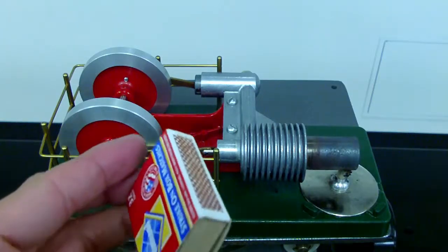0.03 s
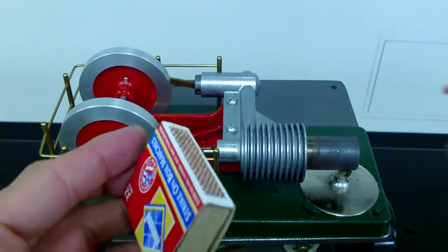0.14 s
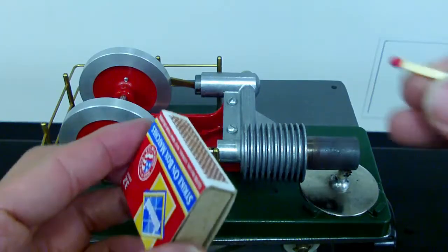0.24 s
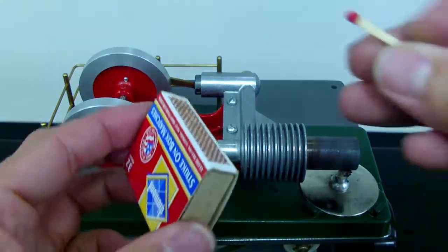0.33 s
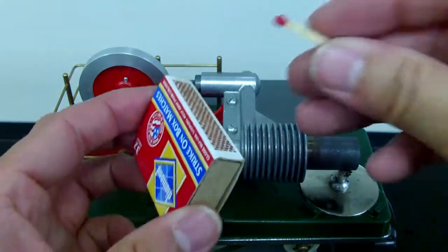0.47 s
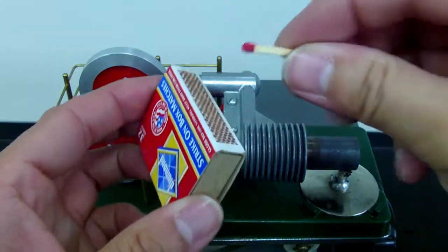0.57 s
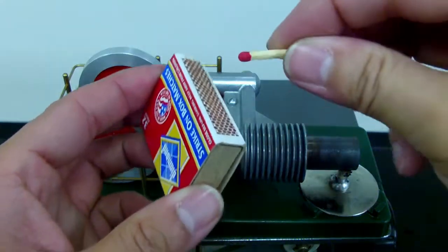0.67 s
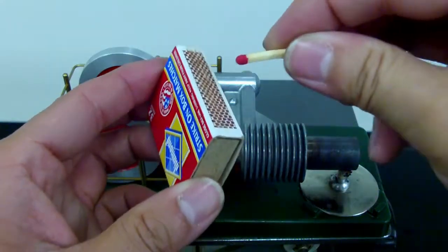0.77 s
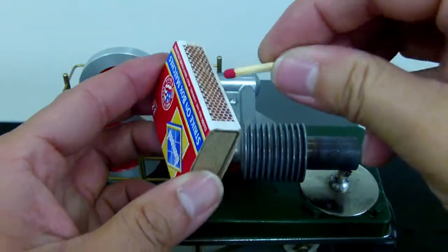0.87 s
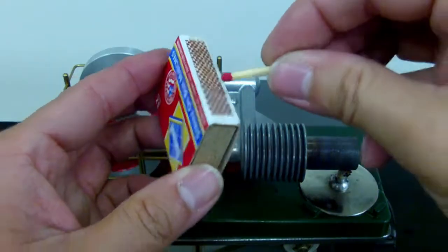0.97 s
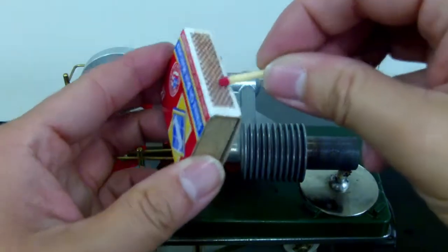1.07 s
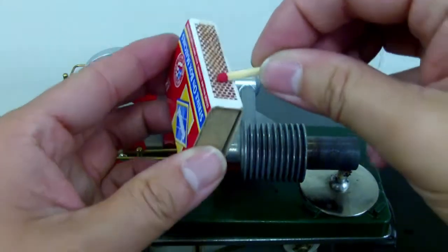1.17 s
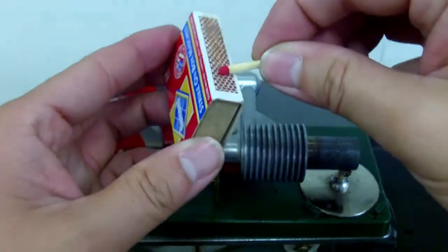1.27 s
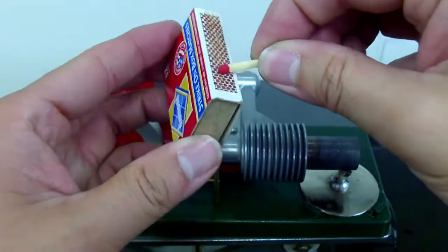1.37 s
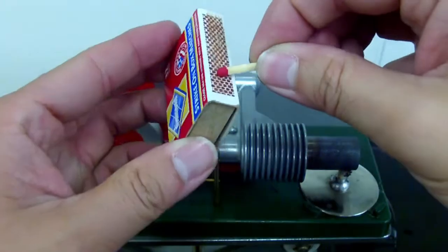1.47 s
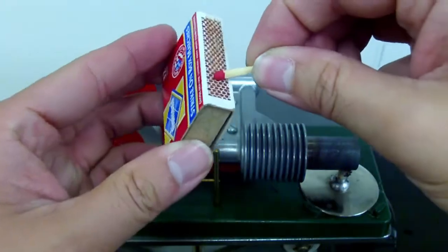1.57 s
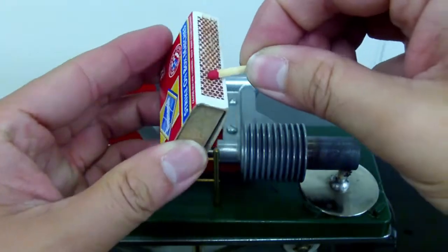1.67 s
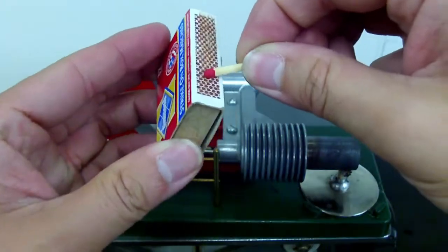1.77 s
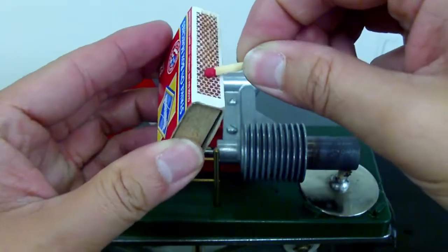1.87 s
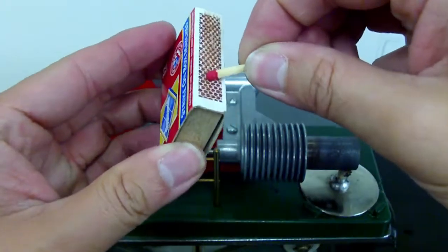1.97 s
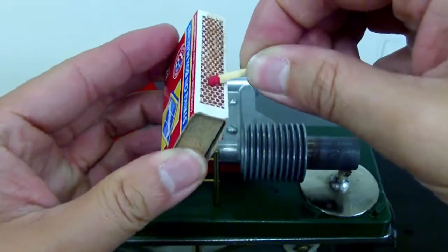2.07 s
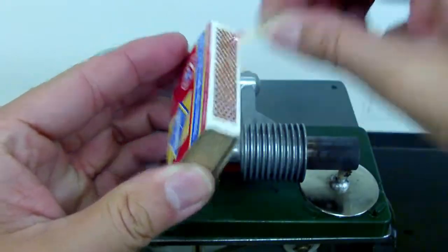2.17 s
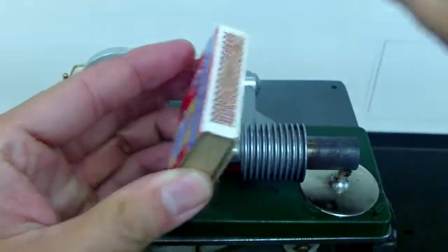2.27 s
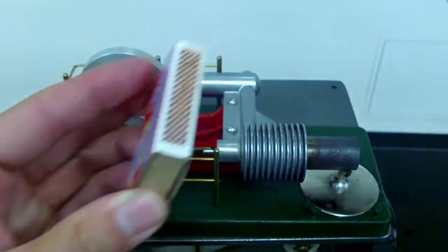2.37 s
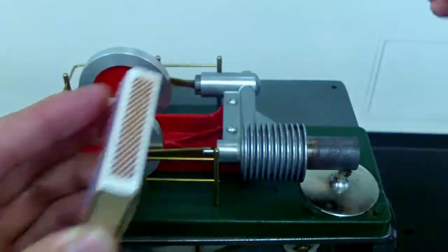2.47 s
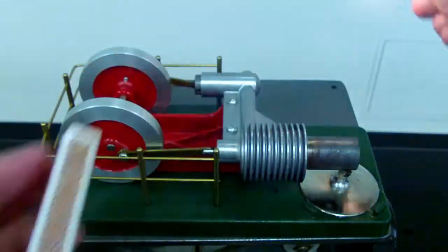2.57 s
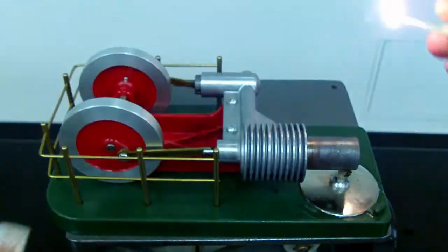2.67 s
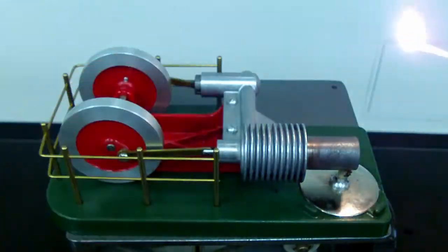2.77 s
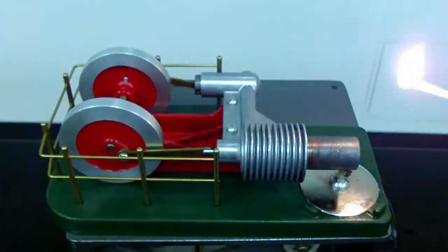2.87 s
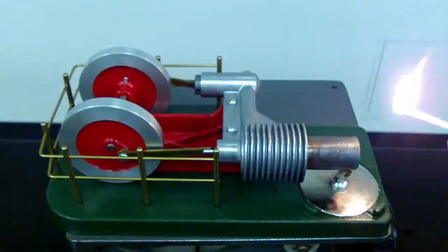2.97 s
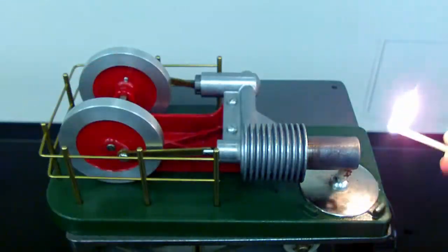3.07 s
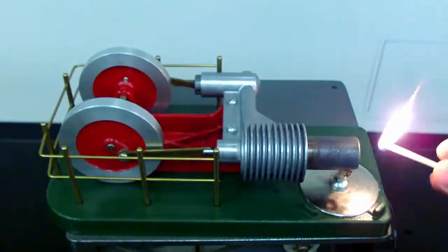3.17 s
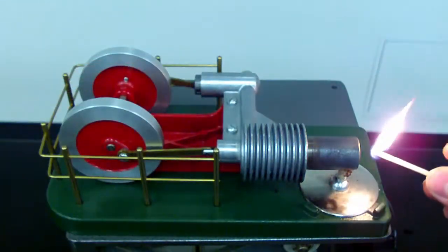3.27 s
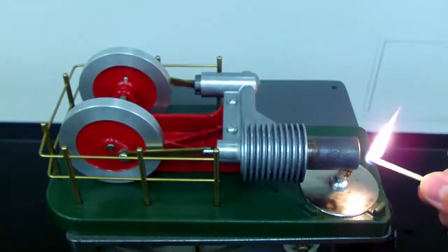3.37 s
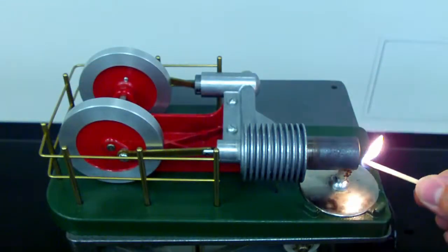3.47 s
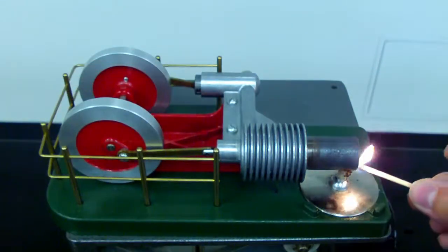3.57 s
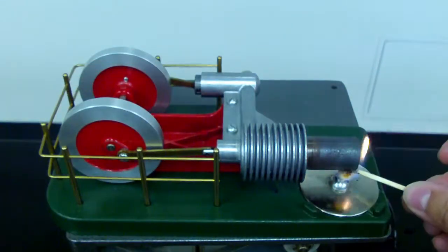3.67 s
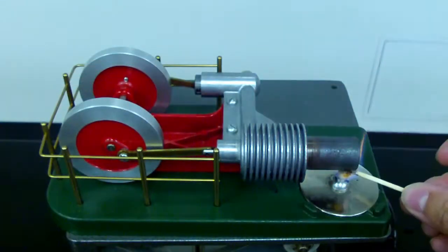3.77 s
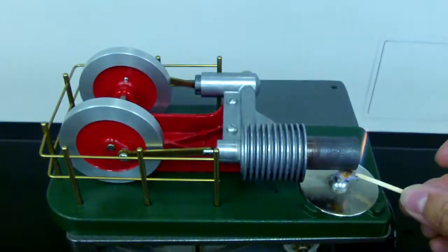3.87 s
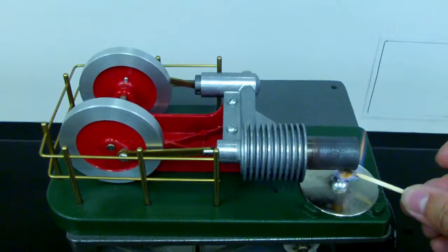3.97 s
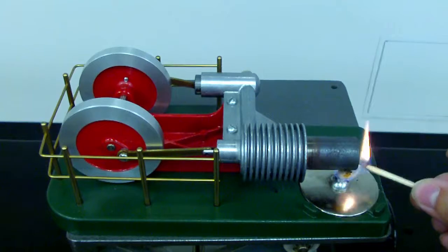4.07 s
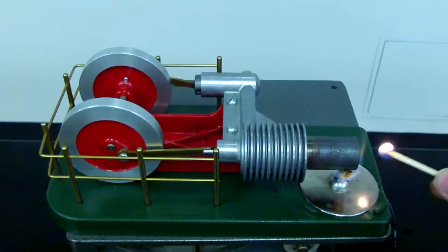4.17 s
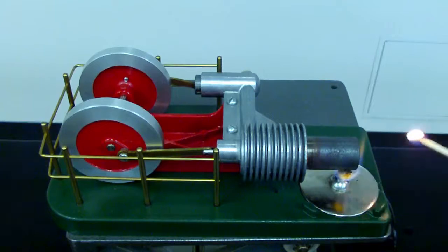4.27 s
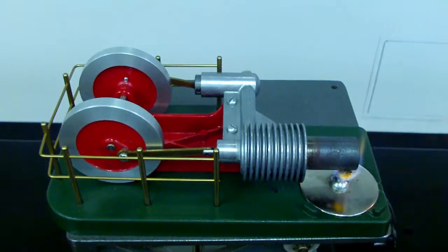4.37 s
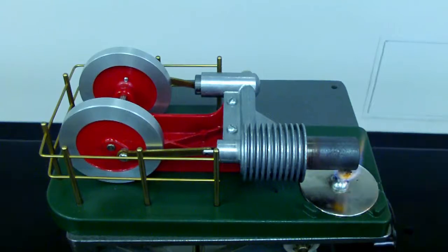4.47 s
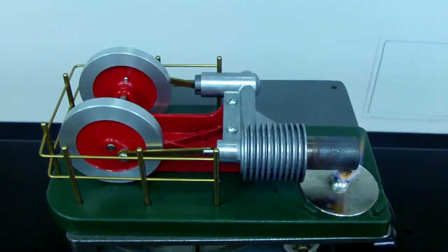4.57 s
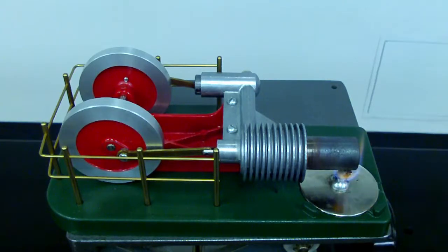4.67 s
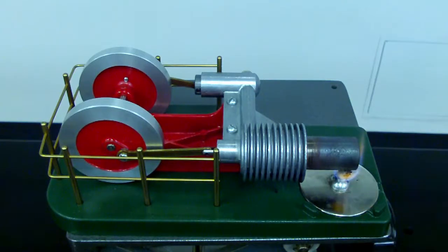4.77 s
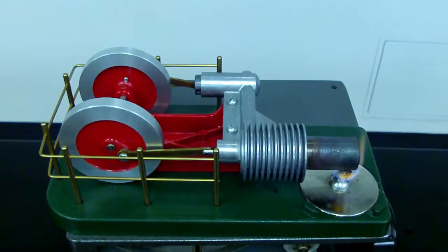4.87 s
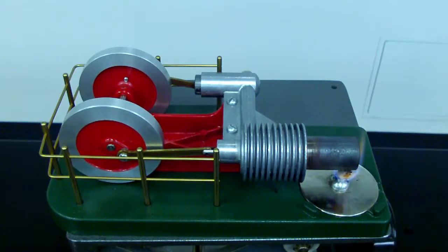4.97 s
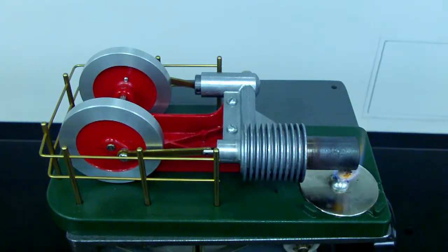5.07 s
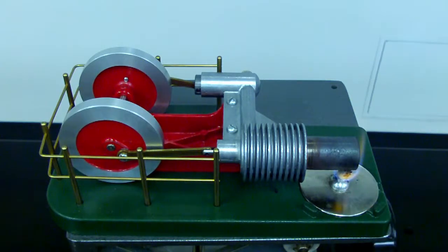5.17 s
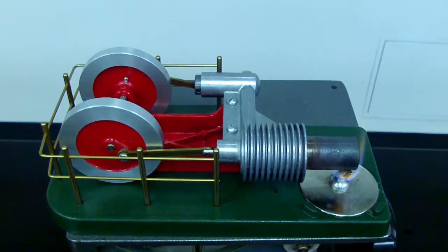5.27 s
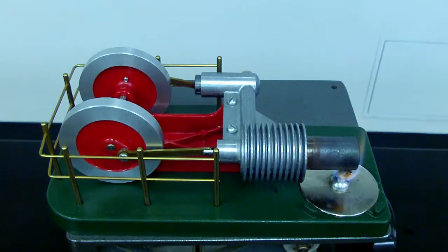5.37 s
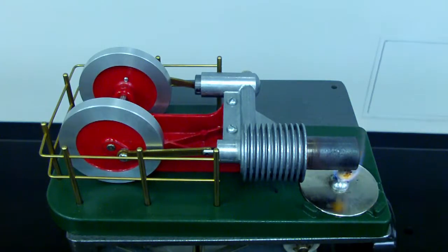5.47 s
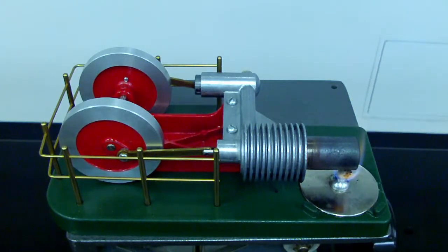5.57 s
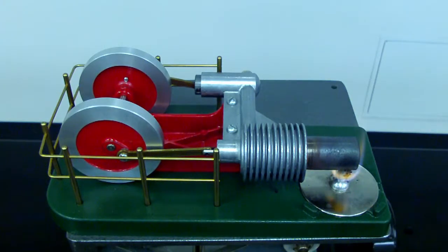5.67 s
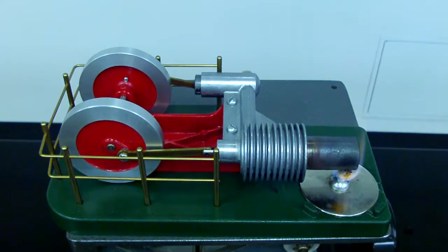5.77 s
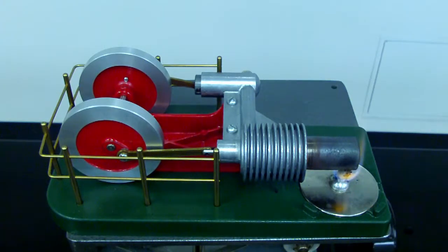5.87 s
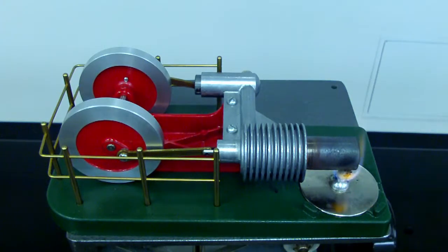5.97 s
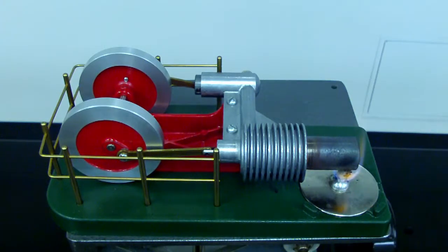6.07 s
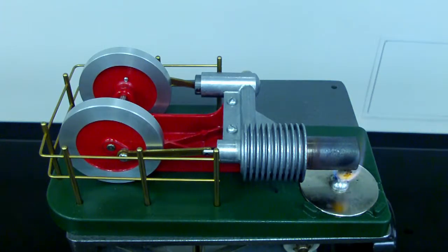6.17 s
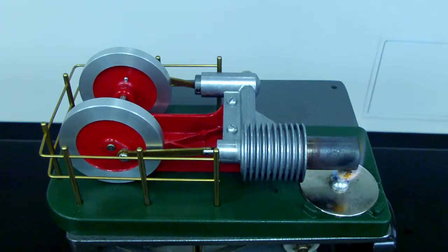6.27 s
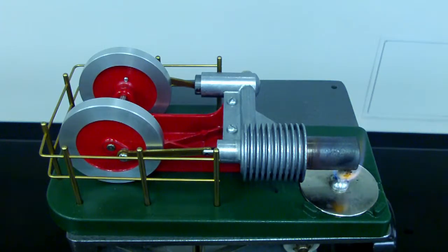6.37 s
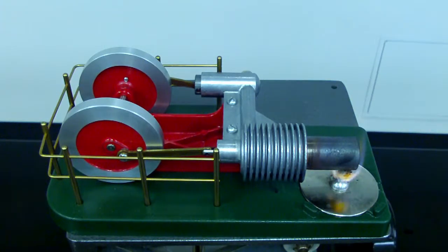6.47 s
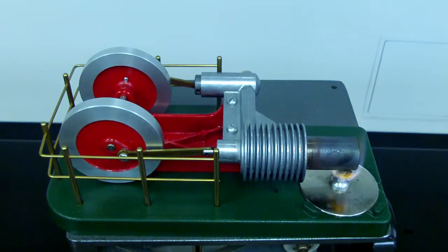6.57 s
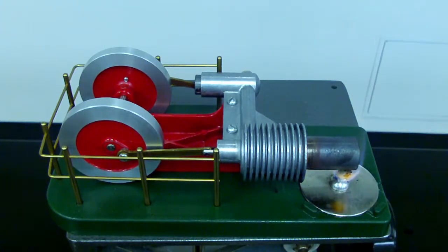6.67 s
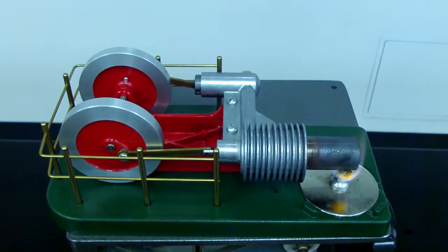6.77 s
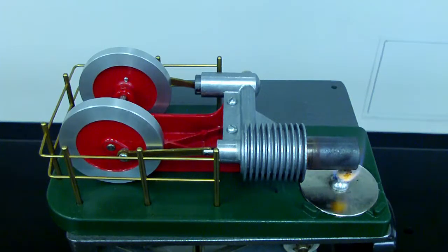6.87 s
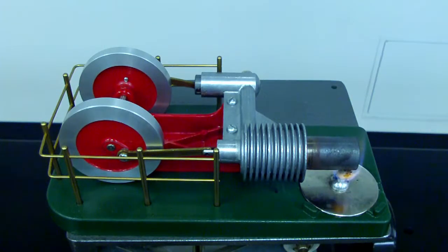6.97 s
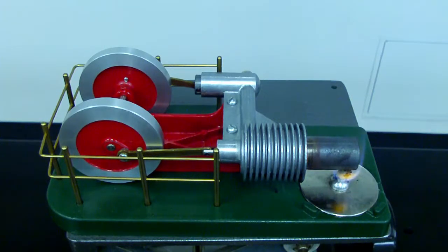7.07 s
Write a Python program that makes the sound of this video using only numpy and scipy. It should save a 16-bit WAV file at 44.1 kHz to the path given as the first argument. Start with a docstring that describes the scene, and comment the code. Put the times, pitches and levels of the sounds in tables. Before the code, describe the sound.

Close, dry handling of a small card box comes first: papery brushes, thin skin squeaks, light hollow taps and tentative scratches. After a brief stillness, a match is struck in one fast, stuttering tear that overloads the small microphone. Gas hisses and spits, sharp pops cluster as the head burns out, and a thin sizzle fades. Afterwards there is only faint room hiss, a slowly returning low murmur, isolated ticks and slight handling sounds.

```python
"""Over quiet-room hiss and a low murmur, fingers brush, knock and lightly scrape a cardboard matchbox close
to a small microphone, a match feeling for its striker; one fast stroke then catches and slips over the grit,
as grain streams that ring the box and stick and overload the microphone. The head flares, fizzes in countless
small bursts and crackles out to a thin sizzle; a few small ticks and scrapes follow. After the stroke a bass
suppressor takes some seconds to let the low murmur back in, because its threshold sinks slowly."""
import sys
import numpy as np
from scipy import signal
from scipy.fft import rfft, irfft
from scipy.io import wavfile
from scipy.ndimage import uniform_filter1d, minimum_filter1d, map_coordinates

SR = 44100
rng = np.random.default_rng(int(sys.argv[2]) if len(sys.argv) > 2 else 0)


def unload_wav(signal):
    """Save mono or channel-first audio to the path in sys.argv[1] as 16-bit WAV at rate SR, clipped to [-1, 1]."""
    wavfile.write(
        sys.argv[1],
        SR,
        np.round(np.clip(np.atleast_2d(signal).T, -1, 1) * 32767).astype(np.int16),
    )


N = 314360
T = np.arange(N) / SR
EASE_DB_PER_S = 52  # light touches ease off as they slide
LIGHT_S = 2.277  # the head catches fire
SNAP_S, SLIP_S = 0.00022, 0.0005  # rise and release of the stroke's contacts

# head catching on the grit and tearing free: start_s, length_s, level_db, box_ring_rel_db, squeal_hz, squeal_rel_db
CATCHES = [(2.202, 0.00027, -1, -11, 10380, -3), (2.203, .0008, -18.5, 9, 8810, -6.5),
           (2.2117, 0.0018, -24, 10, 4460, -5), (2.214, 0.0011, -19.5, 4, 10480, -3.5),
           (2.2213, .0012, 0.5, -17, 10370, -5), (2.2225, 0.0013, -9, -1, 10240, -3),
           (2.231, .0005, -11, -5, 8910, -6), (2.2323, 0.00052, -0.5, -17, 9700, -1),
           (2.234, 0.00089, -6, -13.5, 10230, 0.5), (2.236, .0006, -7.5, 1, 6500, -7),
           (2.237, 0.0019, -3, -11, 8450, -0.5), (2.2423, 0.00056, -8, -10.5, 9420, -0.5),
           (2.2449, 0.0011, -7, -12.5, 9960, -4), (2.2475, .0005, -10.5, -9, 7000, -3),
           (2.2494, .0005, -6, -10, 9800, 0.5), (2.2603, .002, -14.5, -9, 9120, -4.5),
           (2.2636, 0.0014, -5.5, -18, 10700, -2), (2.2658, .0033, -2.5, -19, 10410, -9),
           (2.2699, .0008, -7, -7, 6200, -3), (2.2742, .002, -11, 0, 4110, -2.5)]
# spectrum of escaping gas: freq_hz, relative_db (per Hz)
GAS_SPECTRUM = [(100, -59), (500, -24), (750, -5), (1100, -4.5), (2000, -1.5), (3000, 2), (5000, 1.5),
                (7000, 3), (9500, 5.5), (12500, -1.5), (16000, -3)]


def undb(db):
    """Decibels to gain."""
    return 10 ** (np.asarray(db) / 20)


def unit(x):
    """Scale to rms 1."""
    return x / np.sqrt(np.mean(x ** 2))


def colour(x, points, size=4096):
    """Causal minimum-phase filter with the given (Hz, dB) spectrum."""
    hz, db = np.transpose(points)
    grid_hz = np.maximum(np.fft.rfftfreq(size, 1 / SR), 1)
    grid_db = np.interp(np.log(grid_hz), np.log(hz), db)
    cepstrum = irfft(np.log(undb(grid_db)))
    cepstrum[1:size // 2] *= 2  # fold to minimum phase
    cepstrum[size // 2 + 1:] = 0
    impulse = irfft(np.exp(rfft(cepstrum)))
    return signal.fftconvolve(x, impulse)[:len(x)]


def band(x, hz, width_hz):
    """One resonance, gain 1 at its centre."""
    return signal.lfilter(*signal.iirpeak(hz, hz / width_hz, fs=SR), x)


def ring(x, modes):
    """A body's resonances, alternating in sign."""
    return sum((-1) ** k * undb(db) * band(x, hz, width_hz) for k, (hz, width_hz, db) in enumerate(modes))


def walk(rate_hz):
    """Random knots at the given rate joined by straight lines, spread near 1."""
    knots = rng.standard_normal(N // 10)
    return 1.1 * np.interp(T * rate_hz, np.arange(len(knots)), knots)


def grains(rate_hz, spread_db):
    """Tiny fractures at random moments, a few much larger than the rest; rms 1."""
    size = undb(spread_db * np.minimum(rng.exponential(size=N), 5))
    struck = rng.random(N) < rate_hz / SR
    return unit(struck * size * rng.choice([-1, 1], N))


def contact(start_s, length_s, rise_s, release_s, ease_db_per_s):
    """One touch presses, eases off and lifts: its samples, their age and the pressure."""
    i, j = np.searchsorted(T, [start_s - rise_s, start_s + length_s + 10 * release_s])
    age_s = T[i:j] - start_s
    press = np.clip(0.5 + age_s / rise_s, 0, 1) * undb(-ease_db_per_s * age_s)
    lift = np.exp(-np.maximum(age_s - length_s, 0) / release_s)
    return slice(i, j), age_s, press * lift


def friction(rows, texture, spectrum, modes, rise_s, release_s, ease_db_per_s=0):
    """Contacts drive a stream of grains, heard directly and through the resonances that they shake."""
    direct_power, body_power = np.zeros(N), np.zeros(N)
    for start_s, length_s, db, ring_db, *_ in rows:
        span, _, pressure = contact(start_s, length_s, rise_s, release_s, ease_db_per_s)
        direct_power[span] += (undb(db) * pressure) ** 2
        body_power[span] += (undb(db + ring_db) * pressure) ** 2
    shake = texture * rng.choice([-1, 1], N)  # each grain tugs the body one way or the other
    scratch = colour(texture * np.sqrt(direct_power), spectrum) / np.std(colour(texture, spectrum))
    body = ring(shake * np.sqrt(body_power), modes) / np.std(ring(shake, modes))
    return scratch + body


def background(hiss_db=-55.5, whine_db=-69, whine_hz=1030, whine_width_hz=44.78, murmur_db=-66):
    """Filtered noise: steady hiss with a faint narrow whine, over a low murmur."""
    # room hiss spectrum: freq_hz, relative_db (per Hz)
    hiss_spectrum = [(30, -59), (300, -46), (500, -24.5), (750, -1), (1000, 4.5), (2000, 2.5), (3500, 0.5),
                     (6500, -1), (9000, -3), (12000, -6.5), (16000, -6.5)]
    # low murmur spectrum: freq_hz, relative_db (per Hz)
    murmur_spectrum = [(10, 8.5), (25, 6.5), (60, -3.5), (130, -11), (250, -15), (480, -7), (700, -4),
                       (1100, -23), (3000, -56.5)]
    hiss = unit(colour(rng.standard_normal(N), hiss_spectrum)) * undb(hiss_db + 0.5 * walk(11))
    whine = unit(band(rng.standard_normal(N), whine_hz, whine_width_hz)) * undb(whine_db)
    murmur = unit(colour(rng.standard_normal(N), murmur_spectrum)) * undb(murmur_db + 1.39 * walk(23))
    return hiss + whine + murmur


def fingers(rise_s=0.015, release_s=0.015, rel_width=0.2, slowing_per_s=1.1):
    """Skin brushes the card; its ridges add a rasp whose pitch falls as the finger slows."""
    # fingertips sliding on card: start_s, length_s, level_db, card_ring_rel_db, rasp_hz, rasp_rel_db
    rub_rows = [(0.0, 0.0053, -43, -1, 4200, -4), (0.039, 0.024, -48, 1, 4730, 0.5),
                (0.075, 0.12, -49, -4, 4700, -0.5), (0.234, .09, -57, -4, 9500, -7),
                (0.286, .01, -45.5, -16, 5000, -8), (0.298, 0.025, -36.5, -24, 5600, -8.5),
                (0.322, 0.031, -42.5, -12.5, 13500, -5), (0.362, 0.073, -44.5, -10, 4430, -5),
                (0.434, 0.0056, -38, -11, 13000, -8), (0.516, 0.051, -48, -24, 12500, -6),
                (0.607, 0.04, -49, -2, 10700, -3), (0.65, 0.027, -44, -10, 13700, -1),
                (0.738, .1, -51.5, -1.5, 4200, -17), (0.924, 0.029, -55, -22, 10100, -1),
                (1.045, 0.0075, -40, -24, 10000, -8), (3.74, 0.092, -57.5, -18, 3220, -12),
                (4.649, .015, -51, -8, 6800, -7), (5.279, 0.19, -52.5, -13, 9530, -13),
                (6.423, 0.092, -57, 0, 3070, -2)]
    # skin friction spectrum: freq_hz, relative_db (per Hz)
    skin_spectrum = [(200, -20.5), (1500, -23), (3500, -5.5), (6000, -1), (9000, 5.5), (12000, -1.5),
                     (16000, -7)]
    # lightly touched card resonances: freq_hz, width_hz, relative_db
    card_modes = [(1800, 420, 7.5), (4100, 390, 6.1), (6350, 1100, 1.5)]
    texture = grains(14000, 2.0) * undb(1.6 * walk(260))
    out = friction(rub_rows, texture, skin_spectrum, card_modes, rise_s, release_s, EASE_DB_PER_S)
    for start_s, length_s, db, _, hz, rasp_db in rub_rows:
        span, age_s, pressure = contact(start_s, length_s, rise_s, release_s, EASE_DB_PER_S)
        noise = rng.standard_normal(SR // 2)
        ridges = unit(band(band(noise, hz, rel_width * hz), hz, rel_width * hz))
        travel = np.cumsum(np.exp(-slowing_per_s * age_s))
        rasp = map_coordinates(ridges, [travel], mode="mirror")
        out[span] += undb(db + rasp_db) * pressure * rasp
    return out


def fidget(level_db=-59.5, swing_db=3.5, after_db=-4, aim_from_s=1.8, aim_until_s=2):
    """Stray ticks of fingers and card come and go, absent while the hands aim and fainter afterwards."""
    # tick spectrum: freq_hz, relative_db (per Hz)
    tick_spectrum = [(200, -24), (1000, -1), (3000, -1), (6500, -1.5), (10000, -1.5), (16000, -12)]
    moving = (T < aim_from_s) + undb(after_db) * (T > aim_until_s)
    ticks = unit(colour(grains(220, 3), tick_spectrum))
    return ticks * undb(level_db + swing_db * walk(10.0)) * moving


def knocks(decay_s=0.0014, rel_width=0.68, overtone_ratio=2.26, dry_gain=0.096, size=2048):
    """A short, dry jolt rings two quickly damped resonances of the card."""
    # light knocks of box and fingers: start_s, peak_db, pitch_hz, overtone_rel_db
    knock_rows = [(.136, -35.5, 1550, -2), (.56, -31.5, 1590, -6), (0.615, -32, 1490, 1),
                  (.665, -36, 1490, -1), (0.7414, -34.5, 1450, -5), (0.897, -32.5, 1550, 0),
                  (1.2071, -32, 1900, -7), (1.2736, -32.5, 1580, -6), (2.421, -30, 1130, -15),
                  (4.6051, -33, 1770, -2), (4.805, -40.5, 648, -3), (4.8112, -33.5, 1000, -6),
                  (4.8457, -39.5, 1348, -6), (5.9499, -38, 1766, -5)]
    out = np.zeros(N + size)
    for start_s, db, hz, overtone_db in knock_rows:
        jolt = rng.standard_normal(size) * np.exp(-T[:size] / decay_s)
        width_hz = rel_width * hz
        low, high = (band(band(jolt, f, width_hz), f, 2 * width_hz) for f in (hz, overtone_ratio * hz))
        knock = low - undb(overtone_db) * (high + dry_gain * jolt)
        i = int(start_s * SR)
        out[i:i + size] += undb(db) * knock / np.abs(knock).max()
    return out[:N]


def squeaks(wobble_hz=160):
    """Skin sticks and slips on the card fast enough to whistle: a sine with gliding, wobbling pitch."""
    # thin whistles of skin on card: start_s, end_s, first_hz, last_hz, level_db
    squeak_rows = [(0.196, .3, 9440, 11700, -53.5), (.365, 0.412, 10900, 9900, -57),
                   (6.566, 6.768, 9100, 9000, -61)]
    out = 0
    for start_s, end_s, from_hz, to_hz, db in squeak_rows:
        hz = np.interp(T, [start_s, end_s], [from_hz, to_hz]) + wobble_hz * walk(900)
        swell = np.interp(T, [start_s, start_s + 0.023, end_s, end_s + 0.015], [0, 1, 1, 0])
        whistle = np.sin(2 * np.pi * np.cumsum(hz) / SR)
        out = out + undb(db + 1.9 * walk(154)) * swell * whistle
    return out


def scrapes():
    """Light scrapes that ring the box: the head feeling for the striker, later the box being handled."""
    # light scrapes: start_s, length_s, level_db, box_ring_rel_db
    scrape_rows = [(.992, 0.031, -50, -6), (1.0245, 0.0091, -40, -4), (1.036, 0.046, -51.5, 0.5),
                   (1.112, 0.037, -44.5, -1.5), (1.1245, 0.0036, -33.5, -9), (1.175, 0.0071, -49.5, 2),
                   (1.247, 0.017, -48.5, 2.5), (1.315, 0.04, -53.5, -3.5), (1.4895, 0.0044, -34.5, -9),
                   (1.498, 0.084, -45.5, 0), (1.539, 0.0094, -45, 2.5), (1.595, 0.024, -49, 1.5),
                   (1.645, 0.055, -54.5, -0.5), (4.608, 0.034, -51.5, -4), (4.653, 0.022, -52, -10),
                   (4.91, 0.014, -49.5, -9)]
    # light scrape spectrum: freq_hz, relative_db (per Hz)
    scrape_spectrum = [(200, -22), (1000, -6.5), (2800, -3), (4000, 6), (7000, 4.5), (10000, 3.5),
                       (13000, -10), (16000, -24)]
    # lightly touched box resonances: freq_hz, width_hz, relative_db
    box_modes = [(720, 77, -27), (1437, 240, 10.5), (1710, 320, 11.5), (2040, 360, 1.5)]
    texture = grains(8000, 0.92) * undb(3.2 * walk(150))
    return friction(scrape_rows, texture, scrape_spectrum, box_modes, 0.0034, 0.0013, EASE_DB_PER_S)


def pops(debris=0.08, decay_s=0.0023, gain_db=1.5, cluster_db=-25, cluster_s=0.002, size=2048):
    """Each pop is one sharp spike with a brief splutter of its own pitch and length, amid smaller fractures."""
    # loudest flame pops and small dry ticks, before gain and filter: start_s, spike_db, splutter_hz, splutter_rel_db
    pop_rows = [(1.2073, -19.5, 5000, -10), (2.4606, -25, 3200, -12), (2.474, -21, 4020, -8),
                (2.528, -20, 2780, -14), (2.555, -20, 9500, -27), (2.605, -21, 3900, -14),
                (2.622, -27, 1900, 2), (2.6402, -34, 3160, 4), (2.73, -24, 7000, -11),
                (2.743, -22, 5796, -12), (2.752, -25, 2620, -2), (2.799, -20.5, 4000, -18),
                (2.8427, -25, 7500, -7), (2.882, -23, 10000, -10), (2.9402, -15.5, 4000, -15),
                (2.9584, -16, 4000, -22), (3.012, -32, 9000, -4), (3.054, -24, 3000, -14),
                (3.0619, -13.5, 6000, -16), (3.0708, -17.5, 6000, -22), (3.078, -21, 4500, -20),
                (3.1015, -18, 5500, -21), (3.1059, -13.5, 5000, -24), (3.116, -14.5, 2480, -30),
                (3.12, -13.5, 4000, -27), (3.174, -14, 4000, -33), (3.1849, -17.5, 3500, -28),
                (3.212, -14, 5000, -15), (3.2172, -10.5, 3500, -30), (3.265, -26, 10200, -7),
                (3.306, -30.5, 2400, -5), (3.3596, -16.5, 1654, -8.5), (3.5136, -26.5, 11000, -8),
                (3.759, -25, 4000, -15), (3.775, -24, 3000, -16), (3.8145, -30, 3950, -11),
                (4.096, -27, 6040, -14), (4.136, -21.5, 5960, -21), (4.322, -21, 4030, -16),
                (4.418, -24.5, 4020, -12), (4.7182, -31, 8940, -10.5), (4.9595, -25.5, 900, -14),
                (5.147, -32.5, 3000, -8), (5.225, -30, 2010, -11.5), (5.7583, -26.5, 7000, -24.5),
                (5.787, -25, 6000, -20), (5.8848, -14, 4530, -17), (5.8906, -18.5, 5470, -13),
                (6.7275, -20.5, 4500, -21), (6.7913, -32, 3500, -8), (6.858, -28.5, 4980, -15),
                (6.893, -25.5, 7000, -22), (6.9835, -32, 6500, -12.5), (7.0128, -30.5, 5980, -8)]
    # pop filter: freq_hz, gain_db
    snap_spectrum = [(60, -7.5), (400, -16), (800, -3.5), (1500, -3), (5000, 0), (10000, 1), (16000, -7.5)]
    out, unrest = np.zeros((2, N + size))
    lead = size // 2
    fractures = grains(3000, 2.0)
    cluster = np.exp(-np.abs(T[:size] - T[lead]) / cluster_s)
    for start_s, db, hz, splutter_db in pop_rows:
        stretch = np.exp(0.4 * rng.standard_normal())
        decay = np.exp(-T[:size] / (decay_s * stretch)) / np.sqrt(stretch)
        splutter = rng.standard_normal(size) * decay
        pop = debris * splutter + undb(splutter_db) * band(splutter, hz, hz / 2)
        pop[0] = 1
        i = int(start_s * SR)
        out[i:i + size] += undb(db + gain_db) * pop
        unrest[i - lead:i + lead] += undb(db + cluster_db) * cluster
    return colour(out[:N] + unrest[:N] * fractures, snap_spectrum)


def squeals(rel_width=0.13):
    """Each catch chatters at its own pitch for as long as it lasts."""
    out = np.zeros(N)
    for start_s, length_s, db, _, hz, squeal_db in CATCHES:
        span, _, pressure = contact(start_s, length_s, SNAP_S, SLIP_S, 0)
        noise = rng.standard_normal(SR // 10)
        tone = band(band(noise, hz, rel_width * hz), hz, rel_width * hz)
        chatter = tone[-len(pressure):] * pressure
        level = np.linalg.norm(pressure) / np.linalg.norm(chatter)
        out[span] += undb(db + squeal_db) * chatter * level
    return out


def stroke():
    """The head skims, then is pressed home, catching and slipping over grit that shakes the box."""
    # stroke skimming, then pressed: start_s, length_s, level_db, box_ring_rel_db
    slide_rows = [(2.199, 0.02, -33.5, 6), (2.2192, 0.00202, -24.5, 2), (2.2292, .002, -21, -6),
                  (2.2305, .047, -15.5, -7.5)]
    # grit spectrum: freq_hz, relative_db (per Hz)
    grit_spectrum = [(30, -28.5), (250, -30.5), (450, -17), (900, -11.5), (2000, -9), (3100, -2),
                     (4000, -1), (5000, -5), (6800, 4), (9500, 2), (11000, 2), (12500, 0), (16000, -2.5)]
    # hard-pressed box resonances: freq_hz, width_hz, relative_db
    pressed_modes = [(710, 105, -8), (1312, 470, -1), (1765, 560, 3.5), (2910, 170, -6), (4136, 200, -4.5),
                     (6550, 1900, -13)]
    texture = grains(10000, 1.5) * undb(1.1 * walk(1100))
    tearing = friction(slide_rows + CATCHES, texture, grit_spectrum, pressed_modes, SNAP_S, SLIP_S)
    return tearing + squeals()


def stick(drive):
    """The stroke sets narrow resonances of the matchstick ringing."""
    # matchstick resonances: freq_hz, width_hz, gain_db
    stick_modes = [(4030, 80, -2), (6550, 90, -4.5), (7097, 180, -6.5), (9390, 120, -2.5),
                   (10640, 140, -10), (10900, 163, -8)]
    return sum(undb(db) * band(drive, hz, width_hz) for hz, width_hz, db in stick_modes)


def spurts():
    """Spurts of gas as the head catches and burns: grain streams with a low roar."""
    # gas spurts: start_s, length_s, level_db, roar_rel_db
    spurt_rows = [(2.277, 0.0048, -17, -9), (2.283, .055, -37, -2), (2.311, 0.0046, -30, -13),
                  (2.3158, 0.0027, -20.5, -12.5), (2.3295, 0.0011, -30, -5), (2.335, 0.0065, -38, -5),
                  (2.3475, 0.0023, -43, 2), (2.472, 0.018, -45, -13), (2.582, 0.02, -49, -5),
                  (2.729, 0.032, -48, -7.5), (2.799, .004, -45, -7), (2.8425, 0.0027, -38, -16),
                  (2.879, 0.0034, -41.5, -18), (3.305, 0.018, -54, -1)]
    # roar resonances: freq_hz, width_hz, relative_db
    roar_modes = [(1100, 885, -3.5), (1930, 558, 5), (3425, 1400, -11)]
    return friction(spurt_rows, grains(8200, 1.9), GAS_SPECTRUM, roar_modes, 0.0022, 0.0014)


def burn(flash_db=-29, flash_hold_s=0.025, flash_fall_db_per_s=330.5,
         fizz_db=-42.5, sag_db_per_s=7, spent_s=3.075, die_db_per_s=39):
    """Strength of the gas flow: a short flash, and a slowly sagging burn that dies once the head is spent."""
    age_s = np.maximum(T - LIGHT_S, 0)
    flash = undb(flash_db - flash_fall_db_per_s * np.maximum(age_s - flash_hold_s, 0))
    dying_db = die_db_per_s * np.maximum(T - spent_s, 0)
    steady = undb(fizz_db - sag_db_per_s * age_s - dying_db)
    return np.array([flash, steady]) * (T > LIGHT_S)


def pore(hz):
    """One tiny jet of gas: its pitch and strength wander as the pore opens and closes."""
    jet = band(grains(9900, 1.7), hz, hz / 14)
    travel = np.cumsum(1 + 0.07 * walk(14))
    return map_coordinates(jet, [travel], order=3, mode="mirror") * undb(4.5 * walk(24))


def blisters(rate_hz=100, low_hz=1500, high_hz=11000, rel_db=2, spread_db=6, decay_s=0.0015,
             rel_width=0.34, size=1024):
    """Blisters on the molten head burst at random, each a short puff of its own pitch and strength."""
    out = np.zeros(N + size)
    burn_s = T[-1] - LIGHT_S
    for when, pitch, strength in rng.random((int(rate_hz * burn_s), 3)):
        hz = low_hz * (high_hz / low_hz) ** pitch
        puff = unit(band(rng.standard_normal(size), hz, rel_width * hz)) * np.exp(-T[:size] / decay_s)
        i = int((LIGHT_S + when * burn_s) * SR)
        out[i:i + size] += undb(rel_db + spread_db * (2 * strength - 1)) * puff
    return out[:N]


def flare(crackle_rel_db=-1.5, jets_rel_db=1.5):
    """Gas fizzes out of the burning head in countless small bursts and jets, with bursting blisters."""
    fizz = grains(14000, 2.3) + undb(crackle_rel_db) * grains(600, 4.3)
    jets = unit(sum(pore(hz) for hz in np.geomspace(750, 12000, 16)))
    flutter = undb(2.5 * walk(200) + 0.8 * walk(40))
    gas = unit(colour((fizz + undb(jets_rel_db) * jets) * flutter, GAS_SPECTRUM))
    flash, steady = burn()
    return gas * np.hypot(flash, steady) + blisters() * steady


def sizzle(peak_s=3.2, peak_db=-49.5, fade_db_per_s=29.5):
    """A thin high grain stream swells and fades as the last of the head burns off."""
    # sizzle spectrum: freq_hz, relative_db (per Hz)
    sizzle_spectrum = [(500, -40), (6000, -16), (9000, -1), (11000, 3.5), (14000, -3), (16000, -7.5)]
    hot_grains = unit(colour(grains(3000, 2.6), sizzle_spectrum))
    return hot_grains * undb(peak_db - fade_db_per_s * np.abs(T - peak_s))


def room(x, wet_db=-22, t60_s=0.23):
    """Quick bounces off things nearby and a weak, duller tail from the walls."""
    # first bounces off the desk, the hands and a metal object: delay_s, gain_db
    bounce_rows = [(.00093, -36.5), (.0016, -29), (.0073, -23.5)]
    t = T[:SR // 2]
    tail = rng.standard_normal(len(t)) * undb(-60 * t / t60_s) * (t > 0.006)
    tail = colour(tail, [(100, -9), (1500, 1.0), (7000, 0.0), (16000, -14.0)])
    response = undb(wet_db) * tail / np.linalg.norm(tail)
    for delay_s, db in bounce_rows:
        response[int(delay_s * SR)] += undb(db)
    return x + signal.fftconvolve(x, response)[:N]


def scene():
    """The box and the match in the quiet room."""
    quiet = background()
    box = fingers() + fidget() + knocks() + squeaks() + scrapes()
    strike = stroke()
    flame = pops() + spurts() + flare() + sizzle()
    return (room(box + strike + stick(strike) + flame) + quiet)[None]


def meter(x, window_s):
    """Running level in dB."""
    power = uniform_filter1d(x ** 2, max(int(window_s * SR), 1))
    return 10 * np.log10(np.maximum(power, 1e-14))


def suppressor(x, recover_db_per_s=3.5, ratio=5, click_db=8.0, open_s=0.025, size=1536):
    """Loud sound raises slowly sinking low-band thresholds; weaker sound flutters in and out, sharp clicks pass."""
    # mute threshold under the last loud sound: freq_hz, relative_db
    mute_points = [(20, -45), (100, -55), (200, -62.5), (400, -62), (700, -64), (850, -62.5), (1000, -80),
                   (2000, -100)]
    overlap = size - size // 4
    memory_db = np.maximum.accumulate(meter(x, 0.0039) + recover_db_per_s * T) - recover_db_per_s * T
    hz, times_s, bands = signal.stft(x, SR, nperseg=size, noverlap=overlap)
    edges_hz, under_db = np.transpose(mute_points)
    offset_db = np.interp(np.log(hz + 1), np.log(edges_hz), under_db)
    threshold_db = np.interp(times_s, T, memory_db) + offset_db[:, None]
    # summed over three neighbouring bins
    strength = np.sqrt(np.abs(uniform_filter1d(np.abs(bands) ** 2, size=3, axis=0)) * 3)
    gain = np.minimum(strength / undb(threshold_db), 1) ** ratio
    muted = signal.istft(bands * gain, SR, nperseg=size, noverlap=overlap)[1][:N]
    sharpness_db = meter(x, 0.0018) - meter(x, 0.049) - click_db
    hold = int(open_s * SR)
    held = -minimum_filter1d(-np.clip(sharpness_db, 0, 1), hold)  # running maximum
    opened = uniform_filter1d(held, hold // 2)
    return muted + opened * (x - muted)


def record(dry, notch_hz=7850, notch_width_hz=420, ceiling=0.88, top_hz=15800):
    """The microphone has a narrow treble dip, clips at its ceiling, suppresses weak bass and cuts the top."""
    dipped = dry - 0.91 * band(dry, notch_hz, notch_width_hz)
    dipped = dipped - 0.91 * band(dipped, notch_hz, notch_width_hz)
    clipped = np.clip(dipped, -ceiling, ceiling)
    top_cut = signal.ellip(10, 0.2, 70, top_hz, fs=SR, output="sos")
    return signal.sosfilt(top_cut, suppressor(clipped[0])[None])


dry = scene()
out = record(dry)
unload_wav(out)
```